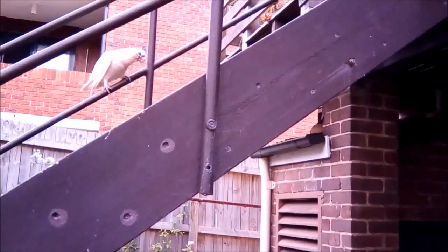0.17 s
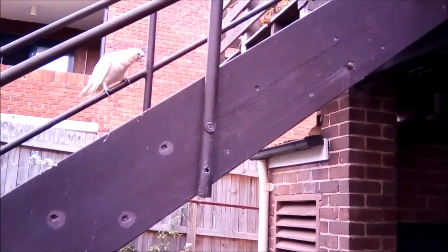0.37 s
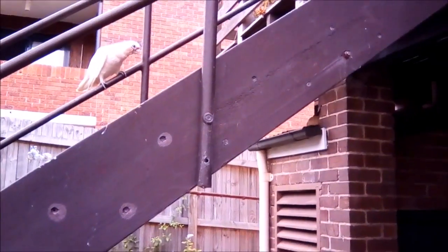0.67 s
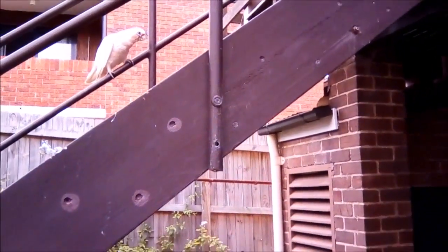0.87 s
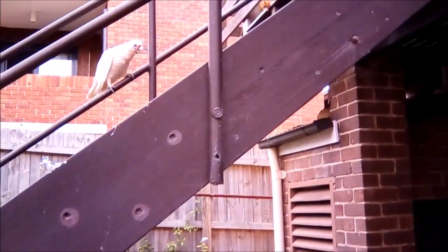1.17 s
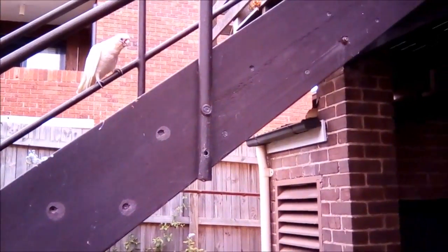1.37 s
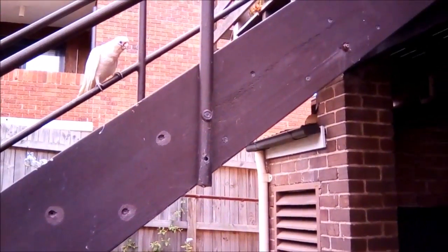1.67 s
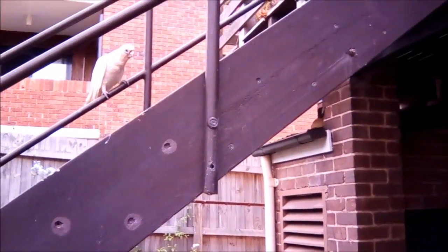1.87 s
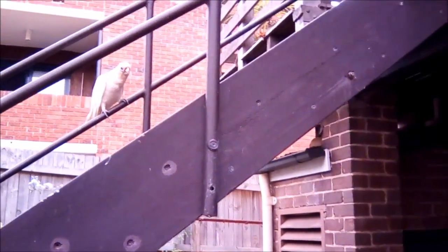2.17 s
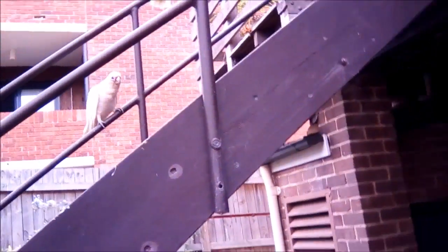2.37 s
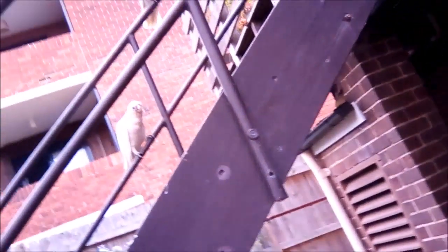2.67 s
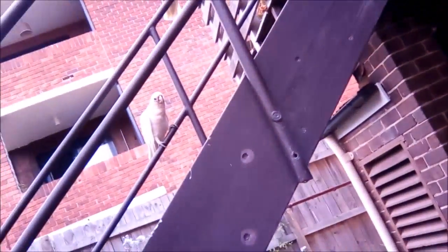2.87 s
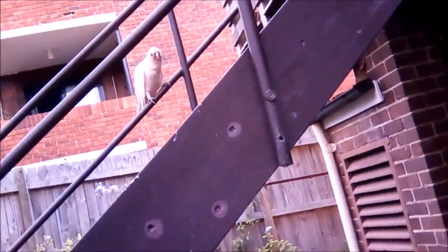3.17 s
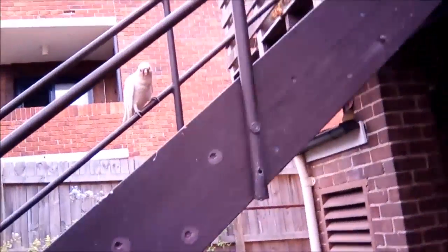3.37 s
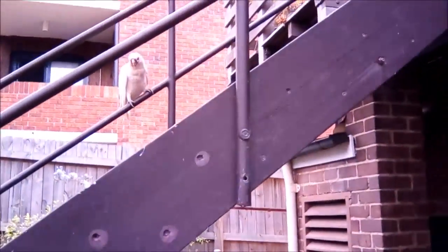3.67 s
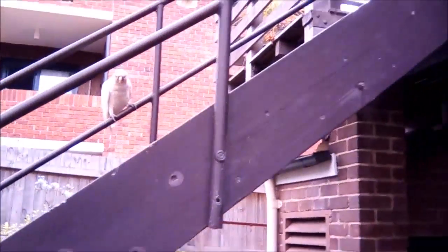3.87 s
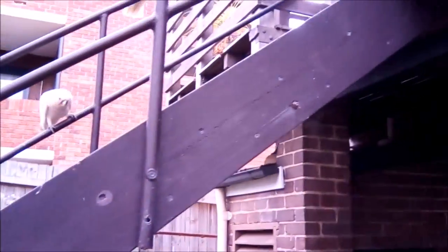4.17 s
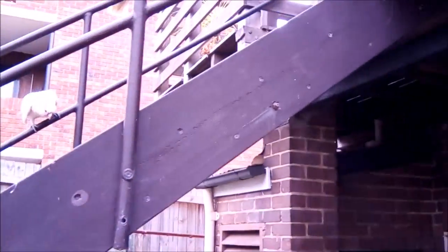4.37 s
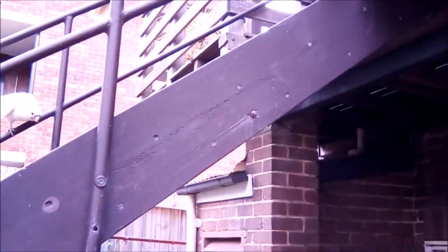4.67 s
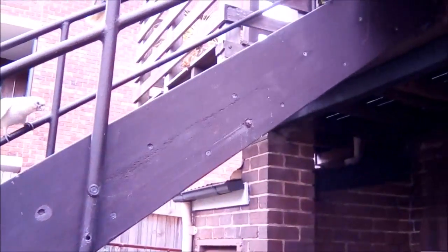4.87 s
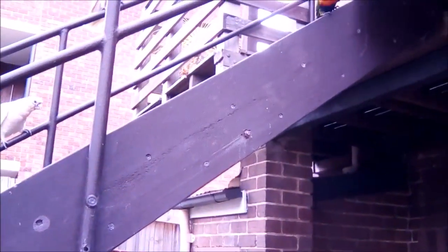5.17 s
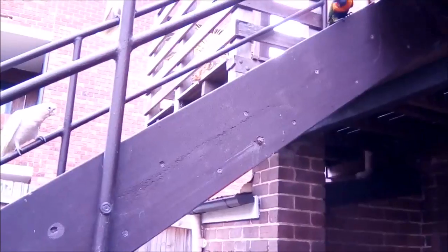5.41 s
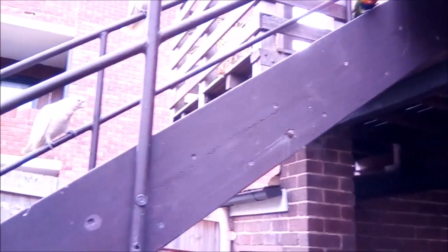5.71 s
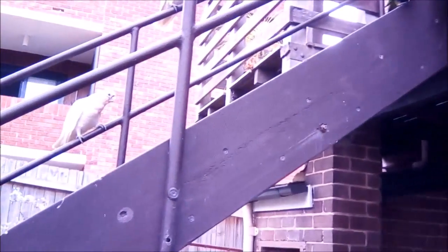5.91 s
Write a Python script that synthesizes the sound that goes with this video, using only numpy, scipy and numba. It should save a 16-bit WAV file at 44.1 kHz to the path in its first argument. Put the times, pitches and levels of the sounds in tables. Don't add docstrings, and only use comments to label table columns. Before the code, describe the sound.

Outdoors between brick walls, raspy cockatoo screeches repeat roughly two or three per second, then stop for about a second and a half. In the gap, thin songbird notes, quick falling chips and light handling knocks are heard. Louder, brighter screeches follow, more widely spaced, with a softer one among them and low-level parrot squawks between. Faint hiss and an early fading hum lie beneath.

```python
import sys
import numpy as np
from scipy import signal
from scipy.fft import rfft, irfft
from scipy.io import wavfile
from scipy.ndimage import uniform_filter1d, minimum_filter1d
from numba import njit

SR = 44100
rng = np.random.default_rng(int(sys.argv[2]) if len(sys.argv) > 2 else 0)


def dump_mix(stems):
    frames = np.atleast_2d(stems).T
    limited = np.clip(frames, -1, 1)
    pcm = np.round(limited * 32767).astype(np.int16)
    wavfile.write(sys.argv[1], SR, pcm)


def amplitude_ratio(level_db):
    exponent = np.asarray(level_db, float) / 20
    return 10 ** exponent


N = 266540

# frequency_hz, density_db [dB per Hz]
AIR_COLOUR = [(18, -63), (30, -25), (108, -14.5), (379, -13.5), (900, -13.5), (1400, -12), (2400, -3),
              (4190, -16), (6210, -11.5), (7800, -33.5), (13700, -31.5), (14700, -14.5), (15600, -12.5)]
# time_s, level_db
HUM_LEVEL = [(.09, -72), (.45, -54), (1.6, -62.5), (2.24, -75), (2.46, -66), (3.69, -66), (3.95, -76),
             (6.04, -74)]
# start_s, peak_db, pitch_hz, t60_s
HANDLING_KNOCKS = [
    (2.475, -36, 3000, 0.0036),
    (3.25, -53, 274, 0.041),
    (3.28, -50, 197.5, 0.068),
]
# start_s, length_s, from_hz, to_hz, level_db
STRAY_NOTES = [
    (0.533, 0.057, 2390, 1390, -53),
    (0.554, 0.031, 2660, 1866, -46.5),
    (2.368, 0.037, 2344, 1310, -55),
    (2.565, 0.028, 2188, 2163, -45.5),
    (2.734, 0.041, 2113, 2017, -45.5),
]
# start_s, held_s, drop_after_s, level_db
HIGH_SONG_NOTES = [
    (2.712, 0.02, .014, -46),
    (3.121, 0.025, 0.019, -50.5),
    (3.552, 0.03, .017, -50),
]
LOW_SONG_NOTES = [
    (2.789, 0.08, 0.039, -50),
    (3.244, 0.031, 0.021, -50),
    (3.664, 0.022, .029, -52.5),
]
# held_from_hz, held_to_hz, drop_from_hz, drop_to_hz, drop_s
HIGH_NOTE, LOW_NOTE = (3140, 2960, 3050, 1500, .022), (2376, 2315, 2215, 1305, .025)
# start_s, chips [count, whole part], level_db
CHIP_TRILLS = [
    (2.675, 1.49, -50),
    (2.949, 5.4, -46.5),
    (3.378, 4.5, -47),
]
# start_s, length_s, from_hz, to_hz, top_level_db
PARROT_WHISTLES = [
    (.14, 0.16, 1850, 1348, -44),
    (.828, 0.059, 1596, 2100, -38),
    (.872, 0.067, 2090, 1797, -33.5),
    (.942, 0.073, 1782, 1880, -35),
    (4.985, 0.093, 1702, 1330, -42),
]
# start_s, length_s, pitch_hz, level_db, fade_db [change over the note]
SQUAWK_NOTES = [(1.151, 0.026, 710, -48, 0), (1.178, .032, 788, -40, -5), (1.206, 0.091, 690.3, -40, 2),
                (1.288, 0.029, 794, -34, -3), (1.319, .14, 683, -37.5, -8), (4.047, .052, 748, -50, 3),
                (4.099, 0.037, 589, -54.5, -3), (4.138, 0.13, 470, -59.5, -8.5),
                (5.084, 0.022, 716, -48, 5), (5.106, 0.018, 756, -40.5, 0),
                (5.128, 0.036, 671.5, -37.5, -4), (5.166, .018, 728, -34.5, 2.5),
                (5.184, .042, 832.5, -32.5, -3), (5.222, 0.017, 702, -36.5, -6),
                (5.242, .04, 570, -42.5, -4.5), (5.278, 0.031, 745.5, -39.5, 0.5),
                (5.507, 0.066, 742, -54, 6), (5.562, 0.048, 550, -41.5, -19), (5.615, .11, 453, -60.5, -3)]
# frequency_hz, level_db
SQUAWK_COLOUR = [(400, -2.5), (700, -7.5), (1400, 0.5), (2100, 3), (2750, 3.5), (3400, -3.5), (4500, -5),
                 (6000, -5.5), (8000, -21)]
# start_s, length_s, level_db, closed [share the tract starts shut], open_db [upper beak resonance]
COCKATOO_CALLS = [(.06, 0.16, -40, 0.013, 0.5), (0.277, 0.16, -19, 0.28, -1),
                  (.615, 0.16, -19.5, 0.32, -2.5), (0.984, 0.17, -19.5, 0.35, -2.5),
                  (1.291, .18, -19.5, .25, 0), (1.5, 0.095, -24, .12, -1.5), (1.626, 0.17, -19, 0.29, -2.5),
                  (1.886, 0.18, -19.5, 0.28, -2.5), (2.141, .16, -18.5, 0.33, -2),
                  (3.716, 0.15, -14.5, 0.27, -5), (4.048, 0.16, -15, .3, -5),
                  (4.408, .162, -15, 0.28, -3.5), (4.782, 0.17, -15.5, 0.33, -3.5),
                  (5.089, 0.19, -24, 0.088, -1), (5.545, 0.15, -14.5, 0.27, -2),
                  (5.846, .16, -15, 0.32, -0.5)]
# centre_hz, level_db
THROAT_BEAK = [(1060, -22.5), (1450, -30), (2100, -21), (2750, -11.5), (3150, -14.5), (3600, -10.5),
               (4130, 4), (4800, -2.5), (5400, -0.5), (6100, -2.5), (6750, -5), (7250, -13.5), (8400, -22),
               (10300, -33.5)]
THROAT_BEAK_WIDTH = [200, 400, 280, 320, 300, 500, 270, 500, 560, 450, 440, 400, 1100, 2000]
SYRINX_HALVES = [1050.8, 1353]


def rms_one(x):
    return x / np.sqrt(np.mean(x ** 2) + 1e-20)


def drift(rate_hz):
    low = signal.butter(2, rate_hz, fs=SR, output="sos")
    return rms_one(signal.sosfilt(low, rng.standard_normal(N)))


def phase(hz):
    return 2 * np.pi * np.cumsum(hz) / SR


def phrase(rows, fade_s):
    s, *columns = np.transpose(rows)
    end_s = s[-1] + fade_s
    where = np.arange(int(s[0] * SR), min(N, int(end_s * SR)))
    t = where / SR
    fade = np.clip((t - s[0]) / 0.0041, 0, 1) * np.clip((end_s - t) / fade_s, 0, 1)
    return where, t - s[0], fade, [np.interp(t, s, c) for c in columns]


def air(level_db=-51.5):
    hz = np.fft.rfftfreq(N, 1 / SR) + 1
    points = np.array(AIR_COLOUR)
    colour = amplitude_ratio(np.interp(np.log(hz), np.log(points[:, 0]), points[:, 1]))
    hiss = rms_one(irfft(rfft(rng.standard_normal(N)) * colour, N))
    settle_db = -14 * np.exp(-(np.arange(N) / SR / 0.21) ** 2)
    return amplitude_ratio(level_db + settle_db + 1.2 * drift(3.6)) * hiss


def hum(centre_hz=125, width_hz=30):
    s, db = np.transpose(HUM_LEVEL)
    band = signal.butter(2, [centre_hz - width_hz, centre_hz + width_hz], "band", fs=SR, output="sos")
    drone = rms_one(signal.sosfilt(band, rng.standard_normal(N)))
    turning_db = np.interp(np.arange(N) / SR, s, db)
    return amplitude_ratio(turning_db - 4.5 + 2 * drift(6.3)) * drone


def knocks():
    out = np.zeros(N)
    for s, db, hz, t60_s in HANDLING_KNOCKS:
        t = np.arange(int(t60_s * SR)) / SR
        i = int(s * SR)
        out[i:i + len(t)] += amplitude_ratio(db - 60 * t / t60_s) * np.sin(2 * np.pi * hz * t)
    return out


def add_song_note(out, start_s, length_s, from_hz, to_hz, db, octave_db, under_db=-60):
    part = np.arange(int(length_s * SR)) / (length_s * SR)
    hoarse = 1 + .045 * rms_one(uniform_filter1d(rng.standard_normal(len(part)), size=12))
    turns = phase(from_hz * (to_hz / from_hz) ** part * hoarse)
    wave = np.sin(turns) + amplitude_ratio(octave_db) * np.sin(2 * turns)
    wave += amplitude_ratio(under_db) * (np.sin(turns / 2) + np.sin(3 * turns / 2))
    i = int(start_s * SR)
    out[i:i + len(part)] += amplitude_ratio(db + 3) * np.sin(np.pi * part) ** .3 * wave


def add_two_part_notes(out, notes, shape, octave_db, drop_db):
    held_from_hz, held_to_hz, drop_from_hz, drop_to_hz, drop_s = shape
    for s, held_s, after_s, db in notes:
        add_song_note(out, s, held_s, held_from_hz, held_to_hz, db, octave_db)
        add_song_note(out, s + after_s, drop_s, drop_from_hz, drop_to_hz, db + drop_db, octave_db=-29)


def songbird(chip_gap_s=.0255):
    out = np.zeros(N)
    for note in STRAY_NOTES:
        add_song_note(out, *note, octave_db=-13.0)
    add_two_part_notes(out, HIGH_SONG_NOTES, HIGH_NOTE, octave_db=-3.5, drop_db=-.5)
    add_two_part_notes(out, LOW_SONG_NOTES, LOW_NOTE, octave_db=-22, drop_db=-1.2)
    for start_s, chips, db in CHIP_TRILLS:
        for k in range(int(chips)):
            s = start_s + k * chip_gap_s
            add_song_note(out, s, .008, 3550, 3150, db + rng.normal(0, 1.5), octave_db=-9, under_db=-10)
            add_song_note(out, s + 0.011, .015, 3150, 2000, db + 0.3, octave_db=-4.5, under_db=-16.5)
    return out


def whistles(edge_db=-14):
    out, hoarse = np.zeros(N), drift(90)
    for s, length_s, from_hz, to_hz, db in PARROT_WHISTLES:
        middle = (s + 0.55 * length_s, np.sqrt(from_hz * to_hz), db)
        rows = [(s, from_hz, db + edge_db), middle, (s + length_s, to_hz, db - 6.0)]
        where, t, fade, (hz, level_db) = phrase(rows, fade_s=0.0073)
        turns = phase(hz * (1 + .015 * hoarse[where]))
        tone = np.sin(turns) + amplitude_ratio(-9) * np.sin(2 * turns)
        out[where] += amplitude_ratio(level_db + 2 + 3 * hoarse[where]) * fade * tone
    return out


def squawks(rough_db=3.0, register_glide_s=.014, droop_per_s=.6, growl_below_hz=540, growl_jitter=.12):
    out, tone, unsteady = np.zeros(N), np.array(SQUAWK_COLOUR), drift(146)
    s, length_s, pitch_hz, db, fade_db = np.transpose(SQUAWK_NOTES)
    t, glide = np.arange(N) / SR, int(register_glide_s * SR)
    note = np.minimum(np.searchsorted(s + length_s, t), len(s) - 1)
    part = (t - s[note]) / length_s[note]
    droop = droop_per_s * length_s[note] * np.clip(part - .5, -.5, .5) * (pitch_hz[note] > 775)
    level_db = db[note] + fade_db[note] * np.clip(part, 0, 1)
    gain = uniform_filter1d(amplitude_ratio(level_db) * (part > 0) * (part < 1), size=glide)
    on = gain > 1e-7
    hz = uniform_filter1d(pitch_hz[note] * (1 - droop), size=glide)[on]
    jitter = .012 + growl_jitter * (hz < growl_below_hz)
    turns = phase(hz * (1 + jitter * unsteady[on]))
    thin_db = -7 * np.clip((hz - 740) / 40, 0, 1)
    for k in range(1, 10):
        colour_db = np.interp(np.log(k * hz), np.log(tone[:, 0]), tone[:, 1])
        colour_db += thin_db * ((k > 3) + .4 * (k == 1))
        flicker_db = rough_db * drift(42)[on]
        out[on] += amplitude_ratio(colour_db + 7.5 + flicker_db) * gain[on] * np.sin(k * turns)
    return out


def breath(start_s, length_s, db):
    end_s = start_s + length_s
    return [(start_s, db - 13), (start_s + 0.03, db - 3), (start_s + 0.51 * length_s, db),
            (end_s - 0.035, db - 1), (end_s, db - 10)]


def syrinx(t, opening, wobble, sizes, jitter=.035):
    chaos, out = 1 - np.exp(-t / .025), 0
    pulse_gain = amplitude_ratio(5.5 * chaos * np.minimum(sizes, 2))
    for pulse_hz, unsteady in zip(SYRINX_HALVES, wobble):
        cycles = np.cumsum(pulse_hz * opening * (1 + jitter * chaos * unsteady)) / SR
        joins = chaos if pulse_hz > SYRINX_HALVES[0] else 1
        out = out + joins * np.diff(np.floor(cycles), prepend=0) * pulse_gain
    return rms_one(out), chaos


@njit
def moving_resonance(x, radius, turn):
    y = np.zeros(len(x))
    for i in range(2, len(x)):
        driven = (1 - radius ** 2) / 2 * (x[i] - x[i - 2])
        y[i] = driven + 2 * radius * np.cos(turn[i]) * y[i - 1] - radius ** 2 * y[i - 2]
    return y


def screeches(hiss=1.0, throb_db=2.0, patchy_db=2.5):
    out, wobble, throb = np.zeros(N), np.array([drift(500), drift(500)]), drift(140)
    chance, patches, waver = rng.standard_normal((2, N)), [drift(67) for _ in THROAT_BEAK], drift(30)
    for start_s, length_s, peak_db, closed, open_db in COCKATOO_CALLS:
        where, t, fade, (level_db,) = phrase(breath(start_s, length_s, peak_db), fade_s=0.0087)
        softer_db = peak_db + 11.5
        lower_db = 3.5 - 0.2046 * max(softer_db, -9.5)
        treble_db = 2.5 + 0.46 * max(softer_db, -6.5)
        facing = np.clip(1 + .17 * (peak_db + 15.5), 0, 1)

        opening = 1.003 * (1 - closed * np.exp(-t / .035)) * (1 + .008 * waver[where])
        pulses, chaos = syrinx(t, opening, wobble[:, where], chance[0, where])
        source = (pulses + hiss * chaos * chance[1, where]) * amplitude_ratio(throb_db * throb[where])

        catches = phase(78 * (1 + .15 * waver[where]))
        flutter = np.sin(catches) + .4 * np.cos(2 * catches + np.pi)
        flutter_db = 8 * facing * np.exp(-t / .3) * flutter
        upper_db = open_db + 4.5 - 16.5 * np.exp(-t / 0.022) + flutter_db
        main_db = -16.5 * np.exp(-t / 0.041) + 4.5 * facing ** 2

        voice = 0
        for k, (hz, db) in enumerate(THROAT_BEAK):
            turn = 2 * np.pi * hz * opening / SR
            radius = np.exp(-np.pi * THROAT_BEAK_WIDTH[k] / SR)
            ring = moving_resonance(moving_resonance(source, radius, turn), radius, turn)
            muffled_db = 60 * closed * np.exp(-t / 0.0051) * max(1 - hz / 3500, -.25)
            mode_db = db + muffled_db + patchy_db * patches[k][where]
            if hz < 3700:
                mode_db = mode_db + lower_db
            if 3700 < hz < 4700:
                mode_db = mode_db + main_db
            if 4700 < hz < 6400:
                mode_db = mode_db + upper_db
            if 5100 < hz < 5700:
                mode_db = mode_db + 3 * facing ** 2
            if hz > 6500:
                mode_db = mode_db + treble_db
            voice = voice + (-1) ** k * amplitude_ratio(mode_db) * ring
        even = np.sqrt(uniform_filter1d(voice ** 2, size=2000))
        out[where] += voice / even * amplitude_ratio(level_db - 2.5) * fade
    return out


def yard(x, t60_s, bright_t60_s, gap_s):
    t = np.arange(int(.9 * SR)) / SR
    noise = rng.standard_normal(len(t))
    dull = signal.sosfilt(signal.butter(2, 4800, fs=SR, output="sos"), noise)
    tail = dull * amplitude_ratio(-60 * t / t60_s) + (noise - dull) * amplitude_ratio(-60 * t / bright_t60_s)
    tail *= np.clip(t / gap_s, 0, 1)
    return signal.fftconvolve(x, tail / np.sqrt(np.sum(tail ** 2)))[:N]


def scene():
    floor = air() + hum() + knocks()
    far = songbird()
    other = squawks() + whistles()
    near = screeches()
    walls = yard(amplitude_ratio(0.5) * near + amplitude_ratio(-6.5) * other, t60_s=0.51, bright_t60_s=0.41, gap_s=0.0028)
    distance = amplitude_ratio(2.5) * yard(far, t60_s=.48, bright_t60_s=.4, gap_s=.01)
    return (near + other + far + walls + distance + floor)[None]


def low_pass(x):
    return signal.sosfilt(signal.butter(12, 16660, fs=SR, output="sos"), x)


def record(dry):
    thump = signal.sosfilt(signal.butter(2, [25, 70], "band", fs=SR, output="sos"), dry ** 2)
    room_left = np.minimum(1, .6 / (np.abs(dry) + 1e-9))
    held = dry * uniform_filter1d(minimum_filter1d(room_left, size=89), size=89)
    bent = held - .07 * held ** 3 + .025 * thump
    cut = signal.sosfilt(signal.cheby2(12, 70, 16150, fs=SR, output="sos"), bent)
    sample = np.arange(N)
    running = (sample > 0.091 * SR) * np.clip((N - sample) / 130, 0, 1)
    return low_pass(cut * running)


dry = scene()
out = record(dry)
dump_mix(out)
```